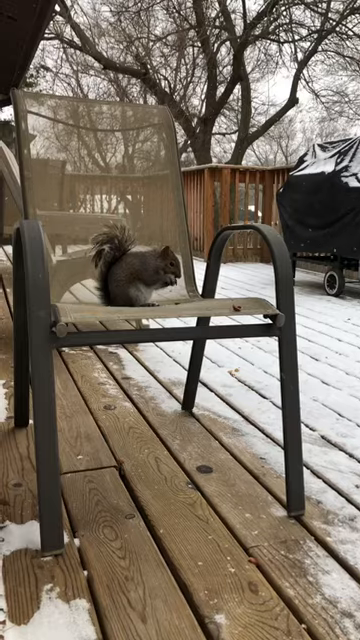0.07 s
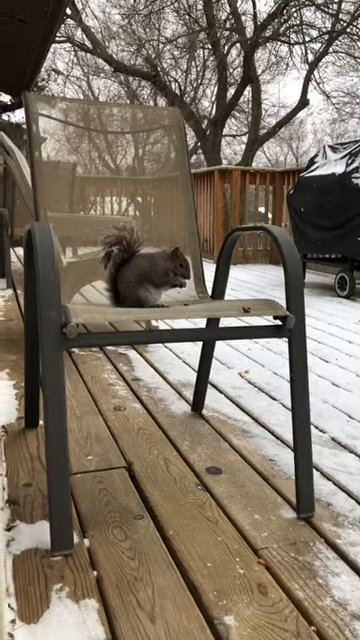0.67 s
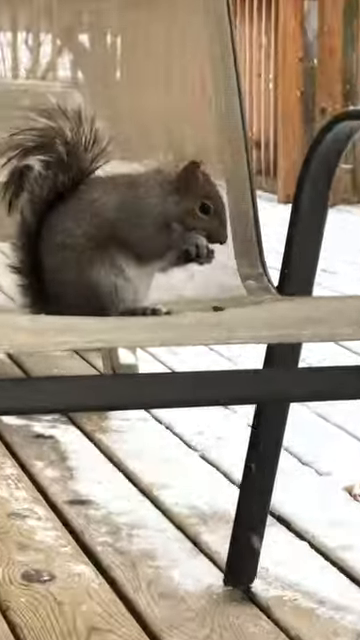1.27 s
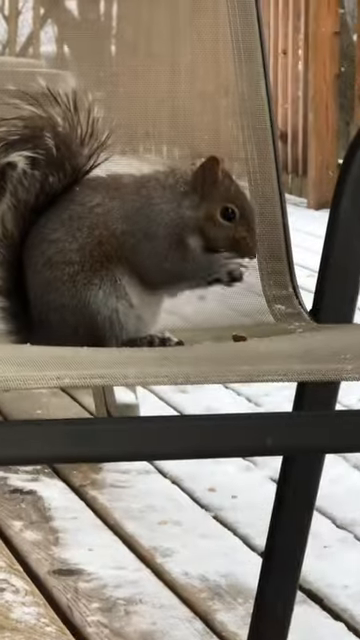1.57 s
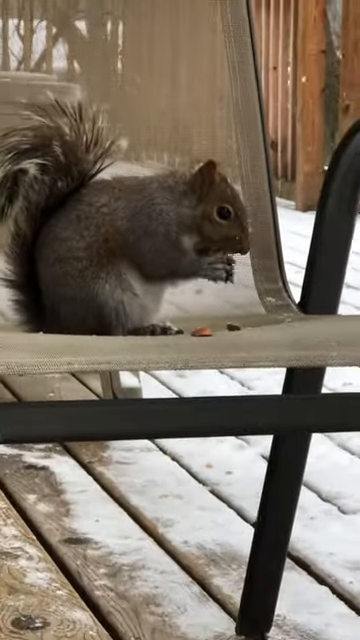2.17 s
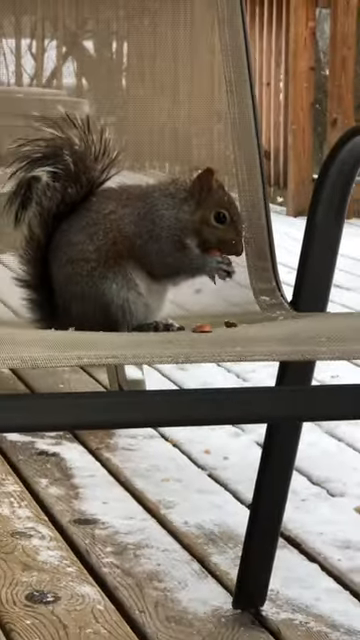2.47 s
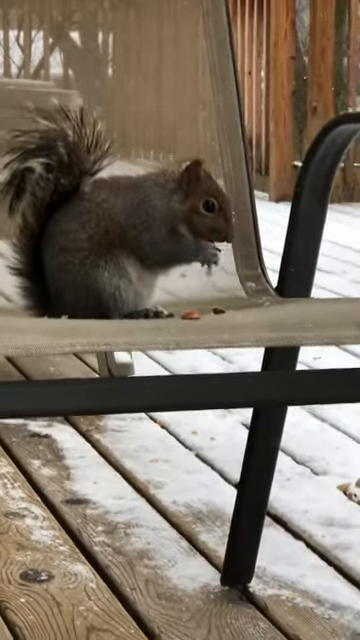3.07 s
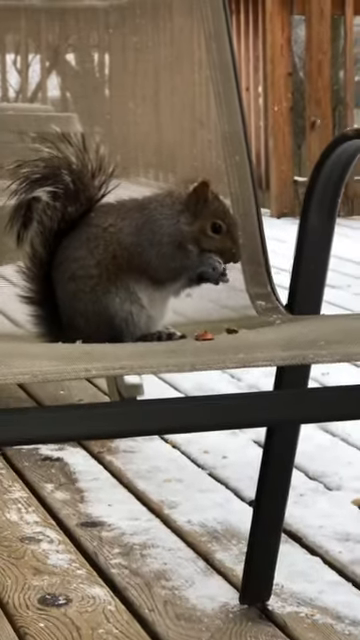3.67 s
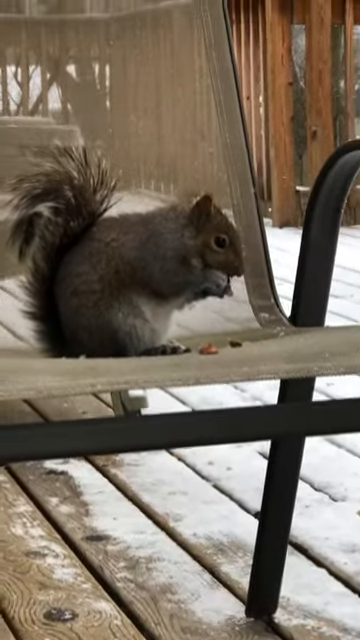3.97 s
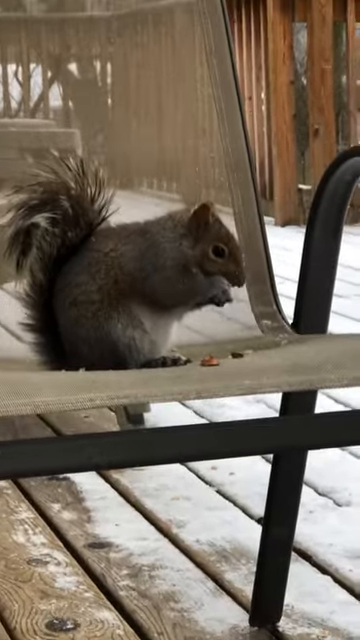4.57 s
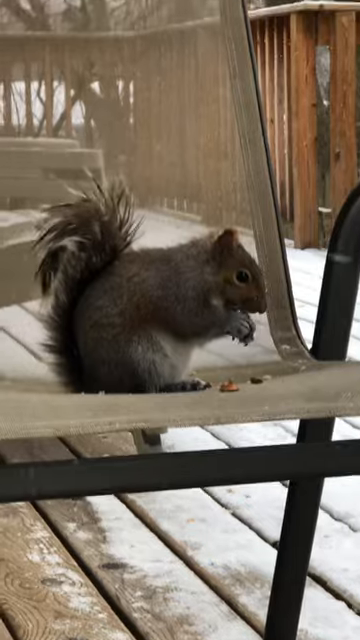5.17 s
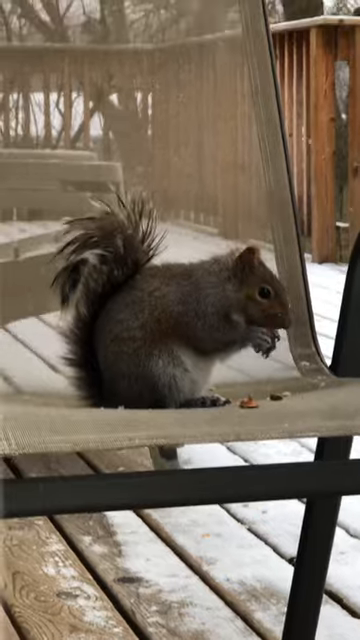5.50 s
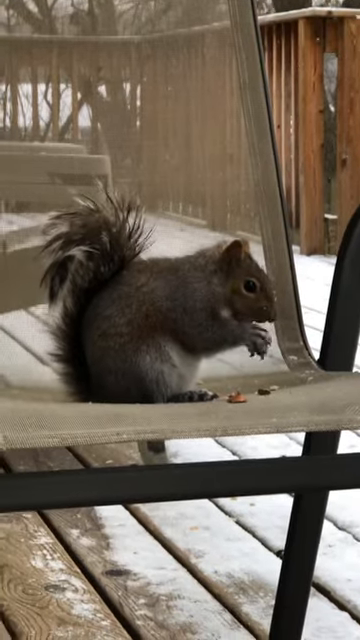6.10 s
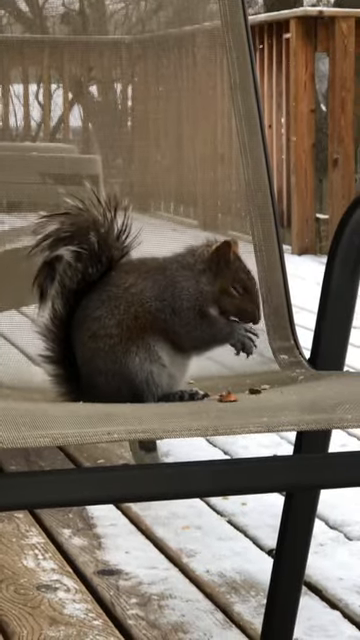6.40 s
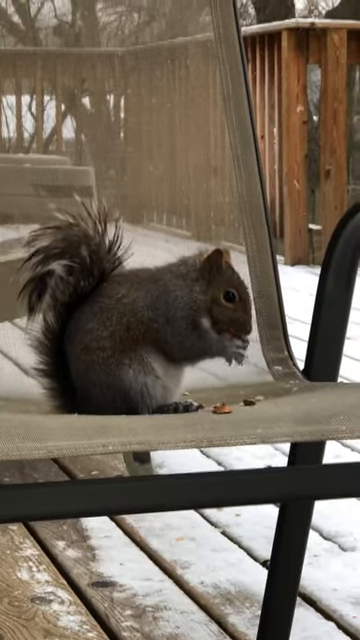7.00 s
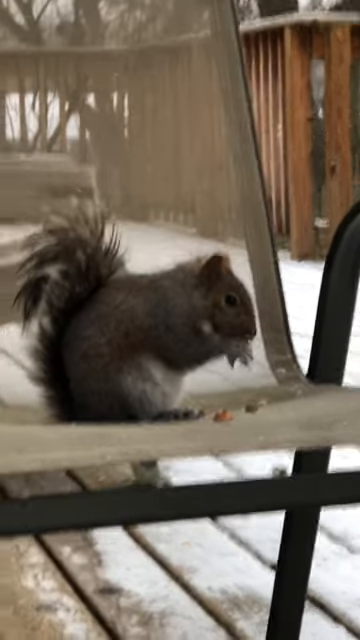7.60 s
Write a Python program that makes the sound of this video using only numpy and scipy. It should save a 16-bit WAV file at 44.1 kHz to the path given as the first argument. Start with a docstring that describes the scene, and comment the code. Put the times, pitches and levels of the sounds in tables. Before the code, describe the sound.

Crisp nutshell cracks and tiny tooth ticks from a nearby squirrel, with fingers rubbing and thudding on the microphone over quiet traffic rumble.

```python
"""On an outdoor deck, a squirrel gnaws a nut on a deck chair, close to a hand-held phone.
The shell cracks in quick clusters, with faint tooth ticks between; chair and deck throw each one back.
Fingers rub and bump on the phone over far traffic, a faint machine hum and a slowly sinking hiss.
Near the end a far bird lisps and a thin squeal swells."""
import sys
import numpy as np
from scipy import signal
from scipy.fft import rfft, irfft, next_fast_len
from scipy.io import wavfile
from scipy.ndimage import map_coordinates

SR = 44100
rng = np.random.default_rng(int(sys.argv[2]) if len(sys.argv) > 2 else 0)


def persist_wave(psi):
    """Save psi, clipped to +-1, as 16-bit WAV."""
    counts = np.round(np.clip(psi, -1, 1) * 32767).astype(np.int16)
    wavfile.write(sys.argv[1], SR, np.atleast_2d(counts).T)


N = 346185


def amp(db):
    """Turn decibels into a number to multiply a sound by."""
    return 10 ** (np.asarray(db) / 20)


def unit(x):
    """Scale a sound so its average size (rms) is 1."""
    return x / np.sqrt(np.mean(x ** 2) + 1e-20)


def along(points, hz):
    """Read between (frequency, value) points, with octaves evenly spaced."""
    freqs, values = np.transpose(points)
    return np.interp(np.log(hz + 1), np.log(freqs + 1), values)


def wobble(per_s):
    """A smooth curve through per_s random values a second."""
    values = rng.standard_normal(int(N * per_s / SR) + 4)
    return map_coordinates(values, [np.arange(N) * per_s / SR])


def filtered(x, response):
    """Turn each frequency in x up or down by response(hz)."""
    size = next_fast_len(N + SR // 2)
    return irfft(rfft(x, size) * response(np.fft.rfftfreq(size, 1 / SR)), size)[:N]


def noise(spectrum):
    """Noise of rms 1 with the given tone colour."""
    return unit(filtered(rng.standard_normal(N), lambda hz: amp(along(spectrum, hz))))


def narrow_noise(centre_hz, width_hz):
    """Noise of rms 1 gathered around one pitch."""
    white = rng.standard_normal(N)
    return unit(filtered(white, lambda hz: np.exp(-.5 * ((hz - centre_hz) / width_hz) ** 2)))


def add(track, s, sound):
    """Mix a sound in at s seconds."""
    room = track[max(round(s * SR), 0):][:len(sound)]
    room += sound[:len(room)]


def random_times(per_s):
    """Random times through the scene, per_s a second on average."""
    times = np.cumsum(rng.gamma(2, .5, size=400)) / per_s
    return times[times < (N - 1) / SR]


def swell(s, length_s):
    """A smooth rise and fall that peaks at s seconds."""
    out = np.zeros(N)
    add(out, s - length_s / 2, np.hanning(round(length_s * SR)))
    return out


def hold_back(x, hz, q):
    """Make the part of x near hz arrive late but no quieter (an all-pass filter)."""
    poles = signal.iirpeak(hz, q, fs=SR)[1]
    return signal.lfilter(poles[::-1], poles, x)


def snap(colour, size=512):
    """The shortest pulse with a sudden start and the tone colour(hz), given in dB."""
    cepstrum = irfft(np.log(amp(colour(np.fft.rfftfreq(size, 1 / SR)))))
    cepstrum[1:size // 2] *= 2  # folding this in half packs the energy at the start
    cepstrum[size // 2 + 1:] = 0
    return irfft(np.exp(rfft(cepstrum)))


# Tone colour of far traffic: f/Hz, relative level/dB
RUMBLE_COLOUR = [(25, -17), (60, -9.5), (150, 1.5), (270, 0), (450, -4), (700, -9), (1000, -12),
                 (1500, -15.5), (2200, -24), (4000, -32), (9000, -60)]


def traffic_rumble(level_db=-53):
    """Far traffic blends into a low, nearly steady rumble."""
    return amp(level_db + .6 * wobble(6)) * noise(RUMBLE_COLOUR)


# Tone colour of the hiss: f/Hz, relative level/dB
HISS_COLOUR = [(300, -16), (1500, -2), (2400, 1.5), (3600, 2), (5200, 0), (7000, -4.5), (10000, -8.5),
               (13000, -11), (15700, -10.5), (16200, -28)]


def outdoor_hiss(start_db=-63.5, floor_db=-71, settle_s=5.5):
    """An even hiss slowly sinks towards a quieter level."""
    settling = np.exp(-np.arange(N) / SR / settle_s)
    return amp(floor_db + (start_db - floor_db) * settling) * noise(HISS_COLOUR)


# The note of a far machine: f/Hz, level/dB (before gain_db)
HUM_TONES = [(816, -74)]


def machine_hum(gain_db=-1, waver_hz=2):
    """A far machine hums, wavering a little in loudness and pitch."""
    out = np.zeros(N)
    for hz, db in HUM_TONES:
        loudness = amp(db + gain_db + 2.1 * wobble(5.3))
        phase = 2 * np.pi * np.cumsum(hz + waver_hz * wobble(8)) / SR
        out += np.sqrt(2) * loudness * np.sin(phase)
    return out


# The hand shifts its grip: start t/s, length/s, relative level/dB
GRIP_SHIFTS = [(1.46, .04, -48), (1.589, 0.089, -44.5), (2.15, .13, -49.5), (2.298, .13, -42),
               (2.68, 0.28, -47.5), (3.058, 0.16, -50.5), (3.322, 0.049, -45), (4.243, .06, -48),
               (4.56, 0.036, -47), (4.78, 0.16, -51), (5.264, 0.22, -48), (5.75, 0.274, -51),
               (6.29, 0.36, -48.5), (6.804, 0.53, -45), (7.482, 0.038, -44), (7.607, 0.14, -45)]


def grip_motion(grab_s=.023, let_go_s=.045, resting_db=-56):
    """How hard the hand rubs: each shift rises, holds and lets go; at rest it still rubs faintly."""
    t = np.arange(N) / SR
    shifts = [amp(db) * np.interp(t, [s - grab_s, s, s + length, s + length + let_go_s], [0, 1, 1, 0])
              for s, length, db in GRIP_SHIFTS]
    return np.maximum(amp(resting_db), np.max(shifts, axis=0))


# Tone colour of skin rubbing the phone: f/Hz, relative level/dB
RUB_COLOUR = [(20, -33), (40, -7), (62, 1.5), (100, -4.5), (160, -2), (260, -9.5), (450, -28.5),
              (1000, -62)]


def hand_rub(motion, gain_db=-.5, lumpy_db=3):
    """Skin drags unevenly over the phone and makes a low, lumpy noise."""
    lumps = amp(lumpy_db * wobble(35))
    return amp(gain_db) * motion * unit(lumps * noise(RUB_COLOUR))


# The hardest finger bumps: t/s, peak level/dB (before gain_db), upper edge f/Hz
FINGER_BUMPS = [(1.595, -38, 80), (2.303, -28.5, 170), (2.41, -36, 110), (2.846, -38, 157),
                (4.999, -39.5, 80), (5.936, -38, 80), (6.012, -39, 159), (6.27, -37, 80),
                (6.506, -27.5, 450), (6.603, -32, 120), (6.819, -36.5, 139), (7.025, -32, 160),
                (7.07, -32.5, 120), (7.111, -27, 300), (7.18, -34, 130), (7.201, -26.5, 260),
                (7.222, -30.5, 170), (7.247, -29, 210), (7.26, -29.5, 171), (7.482, -32.5, 103),
                (7.687, -35.5, 109), (7.738, -29.5, 181)]


def finger_thuds(motion, gain_db=1.5, slips_per_s=12, slip_lift_db=5, slip_edge_hz=95):
    """Fingers bump, or stick and slip at random: each is a soft push whose bass comes out last."""
    bass_cut = signal.butter(3, 55, 'high', fs=SR, output='sos')
    case = signal.butter(5, 590, fs=SR, output='sos')  # the phone's case muffles the push
    push = hold_back(signal.unit_impulse(SR // 12), hz=95, q=.8)
    chance = rng.standard_normal(400)
    slips = [(s, 20 * np.log10(motion[int(s * SR)]) + slip_lift_db + 1.8 * force, slip_edge_hz)
             for s, force in zip(random_times(slips_per_s), chance)]
    out = np.zeros(N)
    for s, db, edge_hz in FINGER_BUMPS + slips:
        skin = signal.butter(2, edge_hz, fs=SR, output='sos')
        thud = signal.sosfilt(np.vstack([skin, case, bass_cut]), push)
        add(out, s, amp(db + gain_db) * thud / np.abs(thud).max())
    return out


# Swells of far traffic: loudest t/s, length/s, level/dB, f/Hz
TRAFFIC_SWELLS = [(1.15, 0.58, -57.5, 320), (3.94, 0.66, -57, 405), (4.95, .5, -59, 436)]


def traffic_swells(width_hz=55):
    """Far traffic swells and fades as a soft drone."""
    return sum(amp(db) * swell(s, length) * narrow_noise(hz, width_hz)
               for s, length, db, hz in TRAFFIC_SWELLS)


# Tone colour of the breaking nut: f/Hz, relative level/dB
NUT_COLOUR = [(300, -36), (900, -26), (1600, -10), (2500, -6.5), (3500, -5.5), (4800, -4), (6600, -4.5),
              (9800, -2), (12000, -1.5), (15000, -2.5), (17000, -13)]


def fracture(tilt_db, piece_hz, piece_db, octaves, splinters=.17, fade_s=.0043):
    """One crack, with energy 1: a sharp snap and a spray of splinters ring the piece that gives way."""
    def colour(hz):
        ring_db = piece_db * np.exp(-.5 * (np.log2((hz + 1) / piece_hz) / octaves) ** 2)
        return along(NUT_COLOUR, hz) + tilt_db * np.log2(hz + 500) + ring_db

    t = np.arange(SR // 50) / SR
    force = splinters * rng.standard_normal(len(t)) * amp(-60 * t / fade_s)
    force[0] = 1  # the snap itself
    force = hold_back(force, min(piece_hz, SR / 3), q=1.7)
    crack = np.convolve(force, snap(colour))[:len(t)]
    return crack / np.linalg.norm(crack)


# Echoes off the seat, deck and chair back: delay t/s, level/dB (against the direct sound)
NEAR_ECHOES = [(.0012, -8), (.0074, -22), (.0098, -36)]


def deck_echo(sound, tail_db=-9, low_fade_s=.17, treble_fade_s=.12, split_hz=7000):
    """Near surfaces echo at once; railing and house wall scatter a short tail whose treble dies first."""
    t = np.arange(SR // 5) / SR
    scatter = rng.standard_normal(len(t))
    low = signal.sosfiltfilt(signal.butter(2, split_hz, fs=SR, output='sos'), scatter)
    treble = scatter - low
    tail = low * amp(-60 * t / low_fade_s) + .79 * treble * amp(-60 * t / treble_fade_s)
    response = amp(tail_db) * tail / np.linalg.norm(tail)
    response[0] = 1  # the direct sound
    for delay, db in NEAR_ECHOES:
        response[round(delay * SR)] += amp(db)
    return signal.fftconvolve(sound, response)


# Shell cracks, and one close echo ringing near 3.2 kHz (at 2.6881 s):
# t/s, relative level/dB, treble tilt/(dB per octave), ring f/Hz, ring boost/dB, ring width/octaves
CRACKS_AND_ECHO = [(1.3575, -6, -2, 4900, 6, 0.23), (1.3638, -12, 2, 2300, 11, .5),
                   (1.3682, -4.5, -3.5, 14600, 16.5, .15), (2.6869, -16, 2, 1900, 16, 0.61),
                   (2.6881, -18, 2.5, 3150, 16.5, .25), (2.69, -18, -1, 15000, 14, .15),
                   (2.7868, -6, 3.5, 5130, 7, 0.47), (2.7943, -19, -2.5, 8500, 8, .4),
                   (3.867, -15.5, -1, 4000, 7, .4), (4.096, -27, -1, 3100, 3, .3),
                   (4.1022, -15, -1, 3700, 6, .4), (4.1073, -8.8, .5, 10000, 9, .5)]


def shell_cracks(gain_db=2):
    """The squirrel's front teeth crack the shell in quick clusters; one crack has a ringing echo."""
    out = np.zeros(N)
    for s, db, *colour in CRACKS_AND_ECHO:
        add(out, s, amp(db + gain_db) * deck_echo(fracture(*colour)))
    return out


# The clearest tooth scrapes: t/s, relative level/dB, ring f/Hz
TOOTH_TICKS = [(1.6851, -47, 13000), (3.9523, -46, 6600), (4.5012, -48, 8020), (4.6279, -50, 9220),
               (4.8045, -50, 9950), (5.2525, -49, 9420), (5.8494, -48, 6660), (6.3285, -49, 10500),
               (7.1157, -49, 9260), (7.154, -41, 8600)]


def tooth_ticks(gain_db=5, nibbles_per_s=2.4):
    """Teeth scrape crumbs off the kernel, with fainter nibbles at random between the clear ticks."""
    chance = rng.standard_normal((400, 2))
    nibbles = [(s, -53.5 + 2 * force, 8000 * 2 ** (.3 * pitch))  # same columns as the table
               for s, (force, pitch) in zip(random_times(nibbles_per_s), chance)]
    out = np.zeros(N)
    for s, db, hz in TOOTH_TICKS + nibbles:
        scrape = fracture(tilt_db=-3, piece_hz=hz, piece_db=9, octaves=.19, splinters=1, fade_s=.02)
        add(out, s, amp(db + gain_db) * deck_echo(scrape))
    return out


# A far bird's calls: loudest t/s, level/dB
BIRD_LISPS = [(6.93, -80), (7.15, -71), (7.33, -76)]


def bird(pitch_hz=5330, width_hz=190, length_s=.13):
    """A bird in the trees gives thin, hoarse lisps."""
    loudness = sum(amp(db) * swell(s, length_s) for s, db in BIRD_LISPS)
    return loudness * narrow_noise(pitch_hz, width_hz)


def squeal(pitch_hz=2066, waver_hz=3, peak_s=7.75, peak_db=-58, rise_db_per_s=46, fall_db_per_s=70):
    """A thin far squeal, like a brake, swells on one pitch and drops away."""
    t = np.arange(N) / SR - peak_s
    db = peak_db + np.minimum(rise_db_per_s * t, -fall_db_per_s * t) + 1.2 * wobble(25)
    phase = 2 * np.pi * np.cumsum(pitch_hz + waver_hz * wobble(30)) / SR
    return amp(db) * np.sin(phase)


def scene():
    """All the sounds add up at the one microphone."""
    background = traffic_rumble() + outdoor_hiss() + machine_hum() + traffic_swells() + bird() + squeal()
    motion = grip_motion()
    hand = hand_rub(motion) + finger_thuds(motion)
    squirrel = shell_cracks() + tooth_ticks()
    return (background + hand + squirrel)[None]


def record(dry, open_s=.032, fade_s=.0045, top_hz=16500):
    """The phone's microphone opens a moment late, fades in and cuts off the highest treble."""
    opening = np.clip((np.arange(N) / SR - open_s) / fade_s, 0, 1)
    return filtered(opening * dry[0], lambda hz: 1 / np.sqrt(1 + (hz / top_hz) ** 120))[None]


dry = scene()
out = record(dry)
persist_wave(out)
```